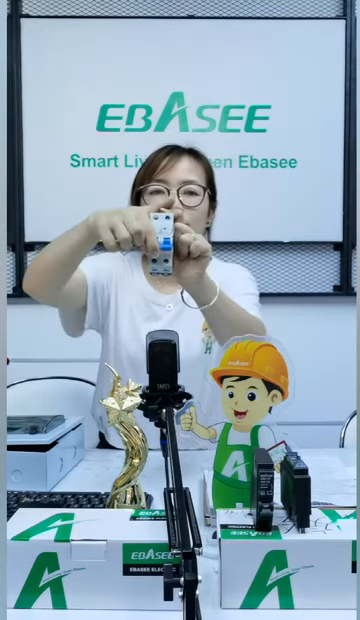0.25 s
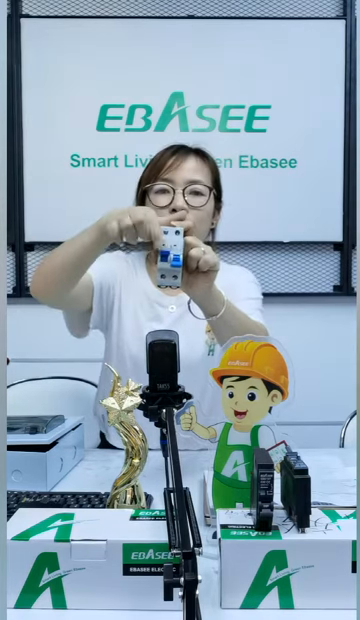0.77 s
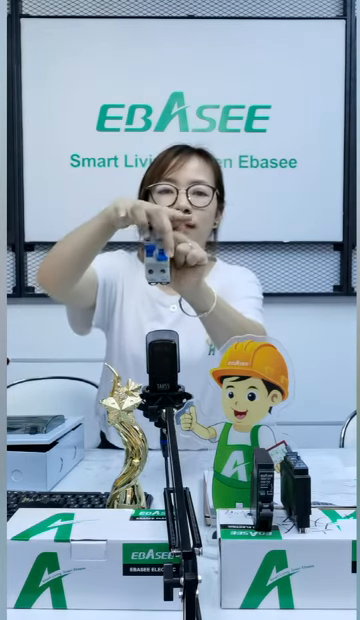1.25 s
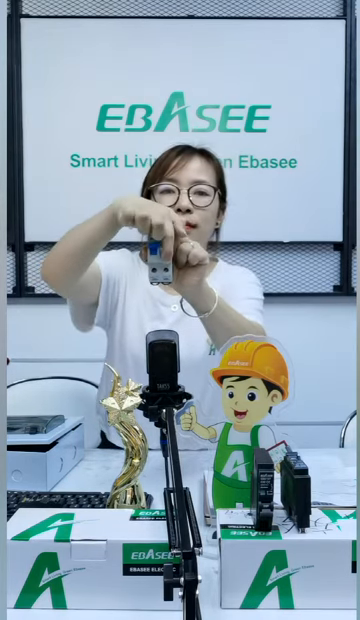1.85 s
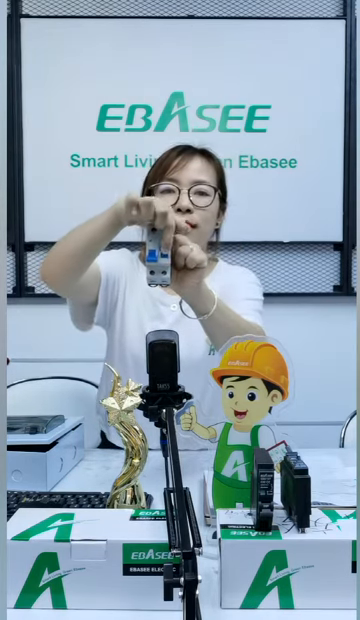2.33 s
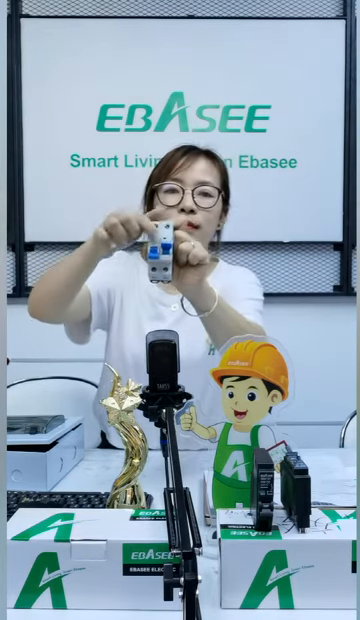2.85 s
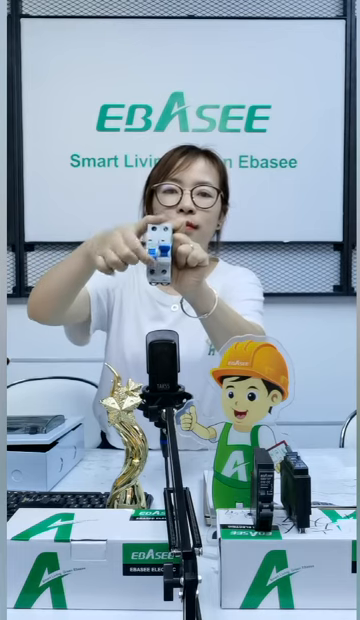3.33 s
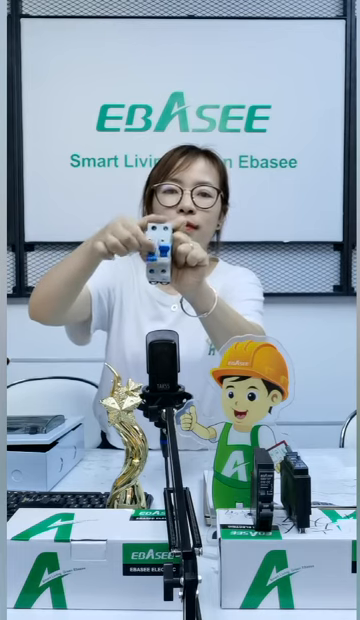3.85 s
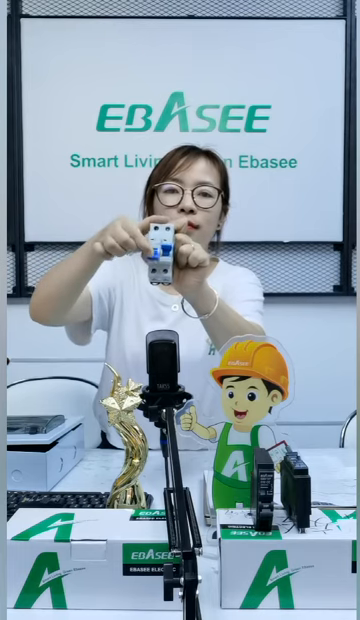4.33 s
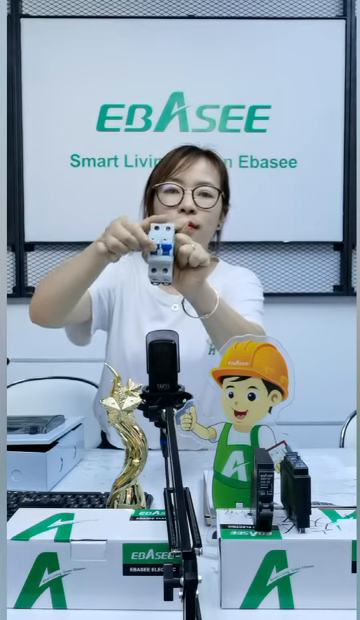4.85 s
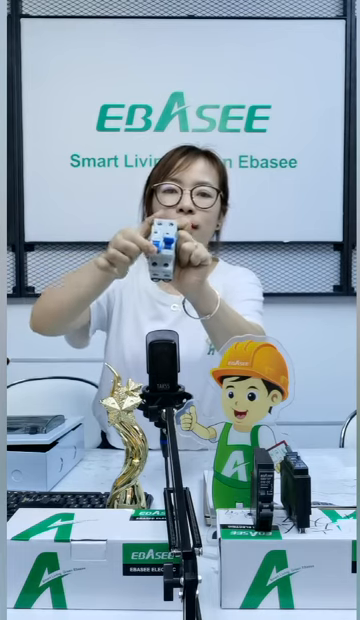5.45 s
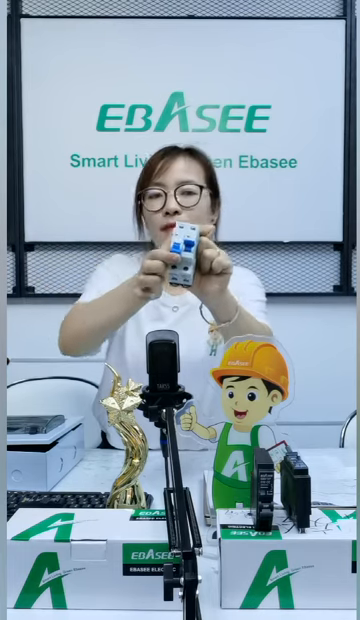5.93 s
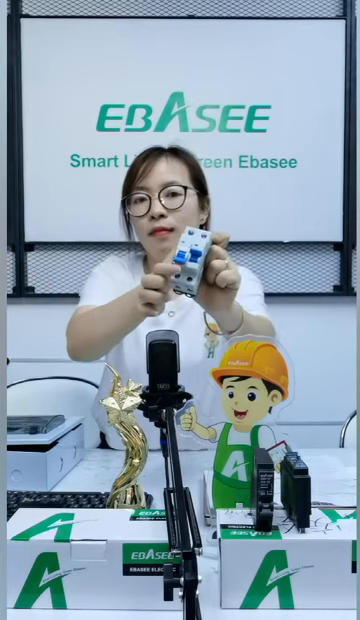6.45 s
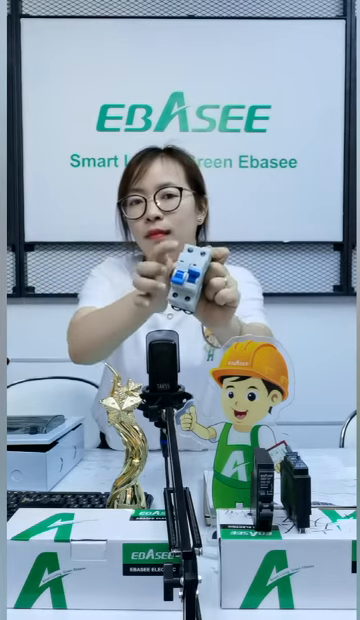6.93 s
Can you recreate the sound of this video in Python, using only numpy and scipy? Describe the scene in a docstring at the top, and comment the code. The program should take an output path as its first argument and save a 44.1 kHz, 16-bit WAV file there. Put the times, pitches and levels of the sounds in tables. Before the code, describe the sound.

Hard, bright clicks of a small circuit breaker, spaced irregularly in a bare echoing room, with faint finger ticks and soft air noise underneath.

```python
"""Snapping a small circuit breaker in a bare room

The two stiff plastic handles of a small hand-held circuit breaker are snapped on and off in a ringing room.
Each snap is a short slide of the latch, a hard stop and a bounce: noise bursts filtered by the case resonances.
Springing off adds a dull thud of low noise; between snaps a handle ticks lightly under the finger.
Under it lie a low ventilation rumble with a wide hiss, both shaped noise, and a faint mains hum of sine tones.
"""
import sys
import numpy as np
from scipy import signal
from scipy.fft import rfft, irfft
from scipy.io import wavfile
from scipy.ndimage import uniform_filter1d

SR = 44100
rng = np.random.default_rng(int(sys.argv[2]) if len(sys.argv) > 2 else 0)


def wav_out(sig):
    """Save sig, one row per channel (or a flat mono array), as 16-bit PCM at SR to the path in sys.argv[1]."""
    wavfile.write(sys.argv[1], SR, np.round(np.clip(np.atleast_2d(sig).T, -1, 1) * 32767).astype(np.int16))


N = 317079
TIME = np.arange(N) / SR
RING = 2 ** 16  # samples in the buffer of one click
BEFORE = SR // 10  # samples of that buffer ahead of the blow
RING_HZ = np.arange(RING // 2 + 1) * SR / RING
TOP_HZ = 15900  # upper edge of the microphone's band


def undb(db):
    """Amplitude gain is ten to the power of decibels over twenty."""
    return 10 ** (np.asarray(db) / 20)


def along(points, hz):
    """Interpolate (Hz, value) points linearly over log frequency."""
    point_hz, value = np.transpose(points)
    return np.interp(np.log(np.maximum(hz, 1)), np.log(point_hz), value)


def walk(rate_hz, size=N):
    """Smoothed random process: held random levels, averaged twice and scaled to unit spread."""
    hold = max(int(SR / rate_hz), 1)
    steps = np.repeat(rng.standard_normal(size // hold + 1), hold)
    smooth = uniform_filter1d(uniform_filter1d(steps, hold), hold)[:size]
    return smooth / smooth.std()


def causal(gain):
    """Minimum phase: folding the cepstrum gives this magnitude a response that rings only after the blow."""
    cepstrum = irfft(np.log(np.maximum(gain, 1e-6)))
    cepstrum[1:RING // 2] *= 2
    cepstrum[RING // 2 + 1:] = 0
    return np.exp(rfft(cepstrum))


# Spectrum of ventilation and air: pitch_hz [Hz], level_db [dB per Hz]
AIR_SPECTRUM = [(20, -80.5), (60, -73.5), (120, -78.5), (170, -75), (250, -80), (400, -86), (550, -89.5),
                (1000, -91.5), (1500, -92), (1800, -104), (2600, -108), (4000, -111), (5200, -118),
                (8500, -120), (11000, -117)]
# Likeness of the air at the two ears: pitch_hz [Hz], correlation [-1 to 1]
EAR_CORRELATION = [(25, 0.38), (60, 0.68), (130, .93), (300, 0.92), (500, 0.35), (1000, 0)]
# Slow swell of the rumble, used relative to its mean: start_s [s], level_db [dB]
RUMBLE_SWELL = [(0.0, -47.5), (0.9, -46.5), (1.4, -49.5), (2.3, -48.0), (2.9, -51.0), (3.7, -48),
                (4.2, -48), (4.7, -48), (5.5, -48.0), (6.2, -47), (7.19, -47.0)]


def ventilation(flutter_db=2.22, flutter_rate_hz=11, rumble_hz=450, air_db=0):
    """Partly coherent diffuse noise: a swelling low rumble, more alike at the ears, under a smooth wide hiss."""
    hz = np.arange(N // 2 + 1) * SR / N
    # Shared and opposed noise, mixed to the wanted correlation
    mid, side = rfft(rng.standard_normal((2, N)))
    alike = np.clip(along(EAR_CORRELATION, hz), -.99, .99)
    opposed = np.array([[1], [-1]]) * side * np.sqrt((1 - alike) / 2)
    ears = mid * np.sqrt((1 + alike) / 2) + opposed
    air = ears * undb(air_db + along(AIR_SPECTRUM, hz)) * np.sqrt(SR / 2)

    low_share = 1 / (1 + (hz / rumble_hz) ** 4)
    rumble = irfft(air * low_share, N)
    hiss = irfft(air * (1 - low_share), N)
    swell_db = np.interp(TIME, *np.transpose(RUMBLE_SWELL))
    swell_db = swell_db - swell_db.mean() + flutter_db * walk(flutter_rate_hz)
    return rumble * undb(swell_db) + hiss


# Hum tones: pitch_hz [Hz], level_db [dB RMS, before wavering]
HUM_TONES = [(60, -60.5), (100, -57.5), (199, -63)]


def hum(waver_db=2, drift_rad=0.51):
    """Sum of sinusoids with slow random amplitude and phase modulation, the same at both ears."""
    total = np.zeros(N)
    for pitch_hz, level_db in HUM_TONES:
        amplitude = np.sqrt(2) * undb(level_db + waver_db * walk(4.9))
        total += amplitude * np.sin(2 * np.pi * pitch_hz * TIME + drift_rad * walk(4.5))
    return total


# Reverberation time of the room: pitch_hz [Hz], t60_s [s]
ROOM_DECAY = [(700, 0.81), (1850, 0.72), (3200, 0.85), (6000, 0.73), (10000, 0.57), (13500, 0.37),
              (16000, .4)]


def room(seconds, build_s=0.0029, bend=1.087, flutter_db=0.28, flutter_rate_hz=130):
    """Diffuse reverberation: band noise, unrelated at the ears, builds quickly and decays, top treble soonest."""
    noise = rfft(rng.standard_normal((2, RING)))
    centres = np.linspace(500, TOP_HZ, 9)
    tail = np.zeros((2, RING))
    for centre, weights in zip(centres, np.eye(len(centres))):
        band = irfft(noise * np.interp(RING_HZ, centres, weights))
        fade_db = -60 * (seconds / along(ROOM_DECAY, centre)) ** bend
        tail += band * undb(fade_db)
    build = 1 - np.exp(-seconds / build_s)
    return tail * build * undb(flutter_db * walk(flutter_rate_hz, RING))


# Spectrum of the dull thud of the case in the hand: pitch_hz [Hz], level_db [dB, relative]
THUD_SPECTRUM = [(25, -5), (70, 4.5), (130, -1.5), (260, -4), (450, -20), (800, -31)]
THUD_DB, THUD_RISE_S, THUD_FALL_S = -17, 0.045, 0.044  # gain added to the snap's; time constants


def thud():
    """Low-frequency impulse response: the jolt in the hand booms, builds and dies, alike at both ears."""
    seconds = np.maximum(np.arange(RING) - BEFORE, 0) / SR
    below_top = RING_HZ < THUD_SPECTRUM[-1][0]
    boom = irfft(rfft(rng.standard_normal(RING)) * undb(along(THUD_SPECTRUM, RING_HZ)) * below_top)
    envelope = (1 - np.exp(-seconds / THUD_RISE_S)) ** 2 * np.exp(-seconds / THUD_FALL_S)
    return boom / boom.std() * envelope / envelope.max()


# Moves, each striking the case at another place, in the order of the level columns below:
# both poles trip, one snaps off, one snaps on, the other latches, a finger flicks a handle
MOVE_NAMES = ["trip", "off", "on", "latch", "flick"]
# Case resonances: pitch_hz [Hz], width_hz [Hz],
# trip_db, off_db, on_db, latch_db, flick_db [dB, peak before the brightness tilt]
CASE_MODES = [ (1076, 330, -1.5, -3, -1, 0.5, -7), (1305, 140, -13, -24.5, -5, 4, -8),
              (1655, 260, 1, -2.5, -3, -2.5, -3), (2024, 404, -2, 2, -3, 3, -1.5),
              (2280, 370, 6, 0.5, .5, 9.5, -1), (2670, 450, 5.5, -5.5, 5.5, 10, 2),
              (2980, 330, 7, 3.5, 9, 10.5, 0), (3290, 395, 5, 5, -4, -1, 0),
              (3730, 600, 1.5, -6.5, 5.5, 1.5, -3), (4150, 930, 4, 5, 3, 3, 2.5),
              (5650, 1062, -1, -.5, -1.5, 1, -1.5), (7240, 2800, -.5, 7.5, 1.5, -1, 3),
              (10020, 1670, 1, 6.5, 2.5, -1, 4), (11200, 5600, -3, 5, 2.5, -2, 0.5),
              (13200, 4900, -6, 4.5, -0.5, -6, 1), ]


def case(move, bright_db, knock_db=-27):
    """Modal resonance: damped plastic modes over a weak broad knock, tilted brighter by a harder contact."""
    column = MOVE_NAMES.index(move)
    power = undb(knock_db) ** 2 / (1 + (RING_HZ / 1500) ** 2)
    for pitch_hz, width_hz, *move_db in CASE_MODES:
        detuning = 2 * (RING_HZ - pitch_hz) / width_hz
        power = power + (undb(move_db[column]) / (1 + detuning ** 2)) ** 2
    octaves = np.log2(np.maximum(RING_HZ, 300) / 5000)  # the tilt pivots at 5 kHz
    return causal(np.sqrt(power) * undb(bright_db * octaves))


def contact(envelope, grit=0.24):
    """Stochastic excitation: a dense burst of tiny uneven impacts, different at each ear."""
    unevenness = np.exp(grit * rng.standard_normal((2, RING)))
    burst = rng.standard_normal((2, RING)) * unevenness * envelope
    # Give each ear the energy of the envelope
    return burst * np.sqrt(np.sum(envelope ** 2) / np.sum(burst ** 2, axis=1, keepdims=True))


def sliding(ms, lead_ms, fall_ms=1.8, gather=1.2):
    """Accelerating friction: the envelope of the latch gathering speed just before the stop."""
    before = np.abs(ms / max(lead_ms, .5)) ** gather
    return np.exp(-np.where(ms < 0, before, ms / fall_ms))


def stop(ms, rise_ms=0.18, fall_ms=0.95):
    """Impact: exponential rise and decay as a lever meets its stop."""
    return np.exp(-np.maximum(-ms / rise_ms, ms / fall_ms))


def rattle(share, spread_ms=5, count=10):
    """Comb filtering: spring and contacts clatter for a few ms, so each click's room tail differs in colour."""
    share = np.clip(share, 0, 1)
    delays = 1 + (rng.exponential(spread_ms, count) * SR / 1000).astype(int)
    sizes = rng.standard_normal(count)
    taps = np.bincount(delays, sizes * np.sqrt(share / np.sum(sizes ** 2)), RING)
    return np.sqrt(1 - share) + rfft(taps)


# Colour of the direct path against the room; a reflection off the table hollows the middle:
# pitch_hz [Hz], level_db [dB]
DIRECT_COLOUR = [(1000, -3), (1650, 4.5), (2300, -4.5), (3200, -1.5), (4000, 4), (4900, 2.5), (6500, 0.5),
                 (10000, 2), (14000, 1.5)]


def click(move, bright_db, stop_db, lead_ms, bounce_ms, bounce_db, slide_db=3, room_db=0, clatter=0.23):
    """Source and filter: slide, stop and bounce excite the case, heard directly and through the room."""
    ms = (np.arange(RING) - BEFORE) * 1000 / SR  # zero at the blow
    slide = undb(slide_db) * contact(sliding(ms, lead_ms))
    bounce = undb(bounce_db) * contact(stop(ms - bounce_ms))
    blows = undb(stop_db) * (contact(stop(ms)) + bounce)
    direct = rfft(slide + blows) * undb(along(DIRECT_COLOUR, RING_HZ))
    tail = undb(room_db) * room(np.maximum(ms, 0) / 1000)
    reverberant = rfft(tail) * rattle(clatter)
    return irfft((direct + reverberant) * case(move, bright_db))


def add(out, start_s, sound):
    """Superposition: add a sound so that its blow falls at start_s."""
    start = int(start_s * SR) - BEFORE
    out[:, start:start + RING] += sound


# Snaps of the handles: start_s [s], level_db [dB, gain of the whole click], move [name],
# bright_db [dB per octave], stop_db [dB, gain of stop and bounce against the room],
# bounce_ms [ms after the stop], bounce_db [dB against the stop]
HANDLE_SNAPS = [ (0.6062, -47, "flick", -2, 8, 3, -11), (0.6282, -29, "flick", 1.4, 10.5, 6.7, -3.5),
                (2.0682, -17, "trip", 1.5, 8, 2.7, -4), (2.0726, -29, "trip", -0.2, 14.5, 1.6, -11.5),
                (2.2369, -26, "trip", 5.5, 5, 1.3, 4), (3.8078, -28.3, "off", -1.4, 11.5, 1.6, -4),
                (4.254, -47.5, "off", -3, 13.5, 6.4, -7), (4.4552, -28.2, "off", -1.6, 11.5, 2.1, 0),
                (5.1489, -22.5, "on", 0.7, 11, 4.5, -10), (6.4668, -37.3, "flick", -1.7, 10, 1, -2),
                (6.8532, -36, "on", 2.5, 11, 1.9, -13), (6.8817, -31, "latch", 4.5, 13, 0.96, 4),
                (6.8832, -21.5, "latch", 2.5, 10.5, 3.7, -13), ]
SNAP_LEAD_MS = 2.56  # time constant of the slide as a released spring throws the lever at its stop
# Light ticks of a handle moved slowly under the finger, some just ahead of a snap:
# start_s [s], level_db [dB, gain of the whole click], bright_db [dB per octave],
# stop_db [dB, gain of stop and bounce against the room]
FINGER_TICKS = [ (0.4690, -54, -3, 10.5), (1.8430, -63.5, -1.5, 11), (3.4570, -60.5, -1, -1),
                (3.492, -61.5, 0.5, 9), (4.438, -50.5, -0.5, 10), (4.8570, -47.5, -1.5, 15.5),
                (6.1740, -52.5, 1.5, 3), (6.447, -63.5, -2.5, 2), (6.838, -55.5, 1, 14), ]
TICK_LEAD_MS, TICK_BOUNCE_MS, TICK_BOUNCE_DB = 11, 2.45, -2  # a long slide and a quick bounce


def breaker():
    """Shared mechanism: quick snaps and slow ticks are one kind of click; springing off also jolts the case."""
    out = np.zeros((2, N + RING))
    for start_s, level_db, move, bright_db, stop_db, bounce_ms, bounce_db in HANDLE_SNAPS:
        snap = click(move, bright_db, stop_db, SNAP_LEAD_MS, bounce_ms, bounce_db)
        add(out, start_s, undb(level_db) * snap)
        if move == "off":
            add(out, start_s, undb(level_db + THUD_DB) * thud())
    for start_s, level_db, bright_db, stop_db in FINGER_TICKS:
        tick = click("flick", bright_db, stop_db, TICK_LEAD_MS, TICK_BOUNCE_MS, TICK_BOUNCE_DB)
        add(out, start_s, undb(level_db) * tick)
    return out[:, :N]


def scene():
    """Superposition of the ventilation, the hum and the breaker."""
    return ventilation() + hum() + breaker()


def record(dry):
    """Band limiting: the microphone cuts the very top with a steep elliptic low-pass."""
    low_pass = signal.ellip(8, .2, 70, TOP_HZ, fs=SR, output="sos")
    return signal.sosfilt(low_pass, dry)


dry = scene()
out = record(dry)
wav_out(out)
```